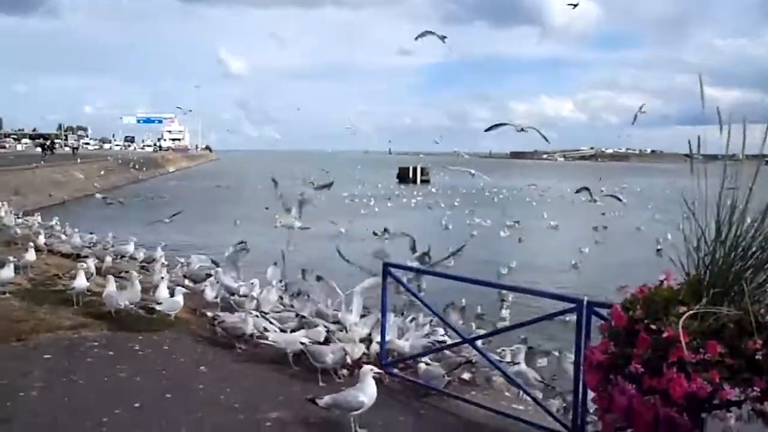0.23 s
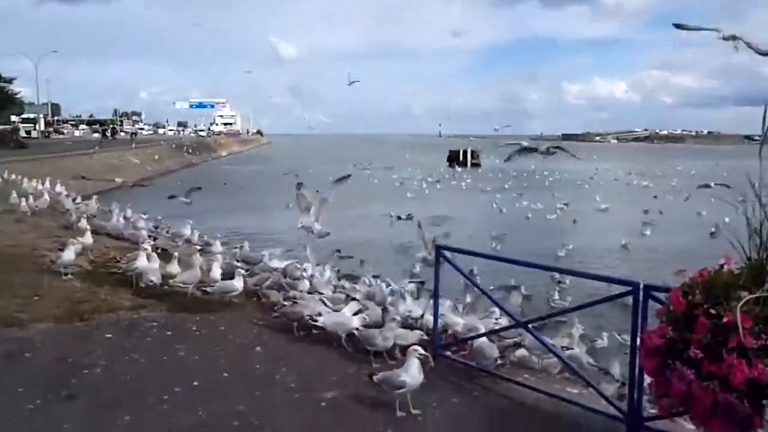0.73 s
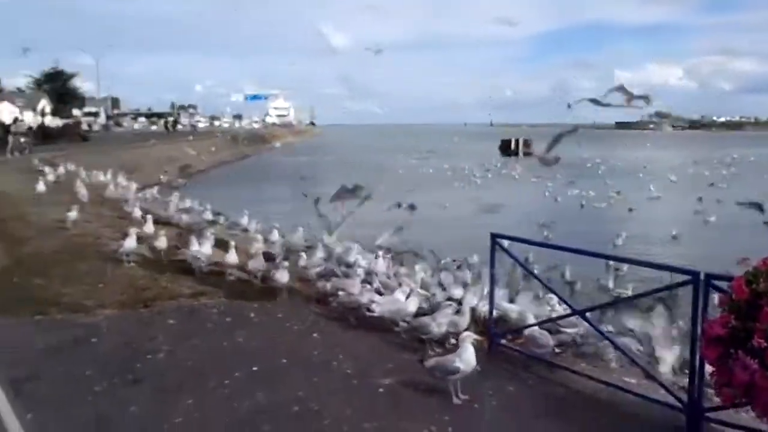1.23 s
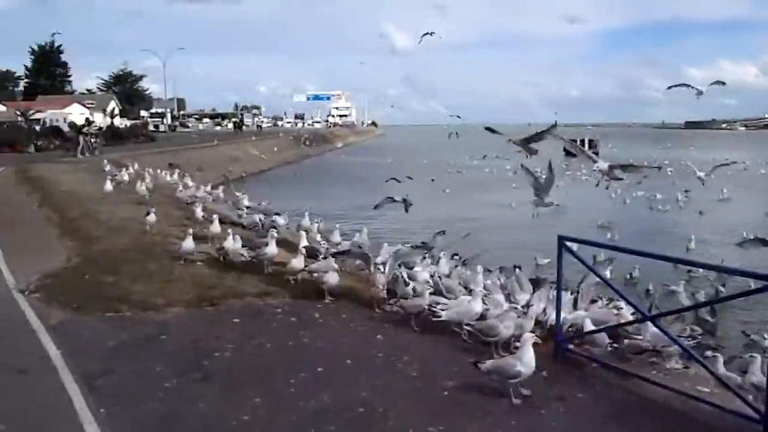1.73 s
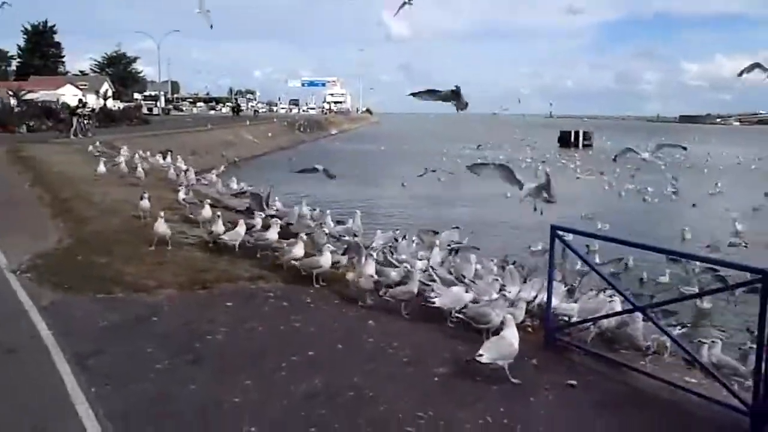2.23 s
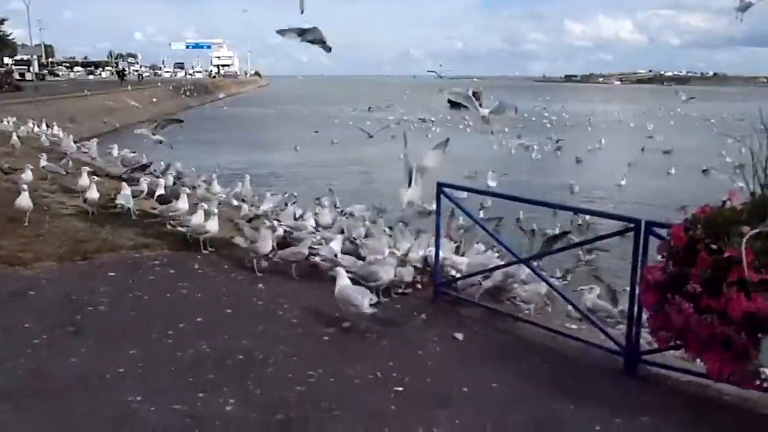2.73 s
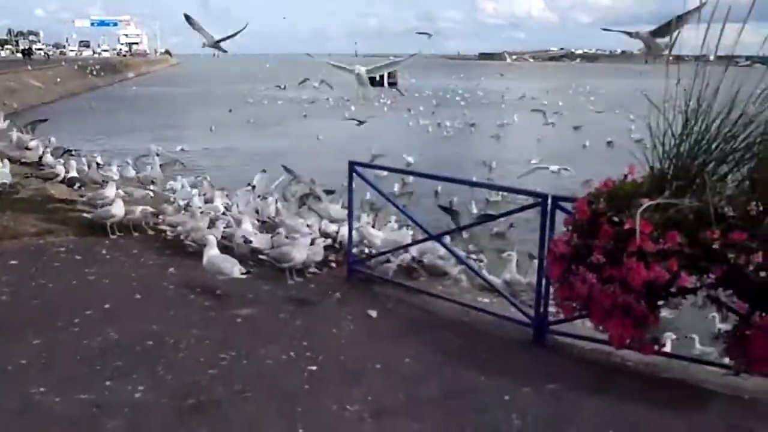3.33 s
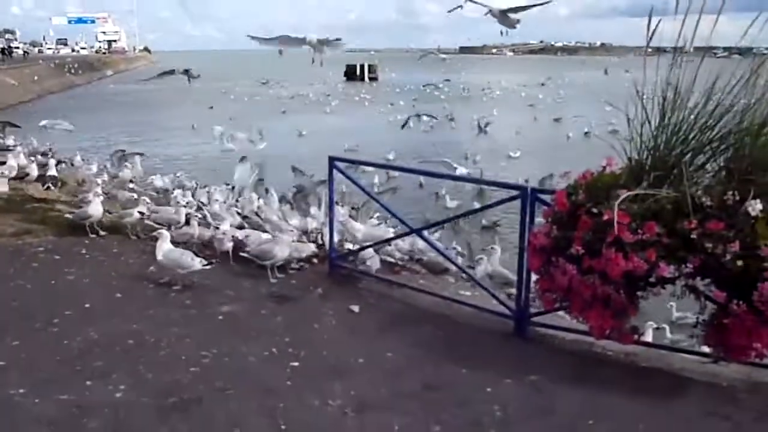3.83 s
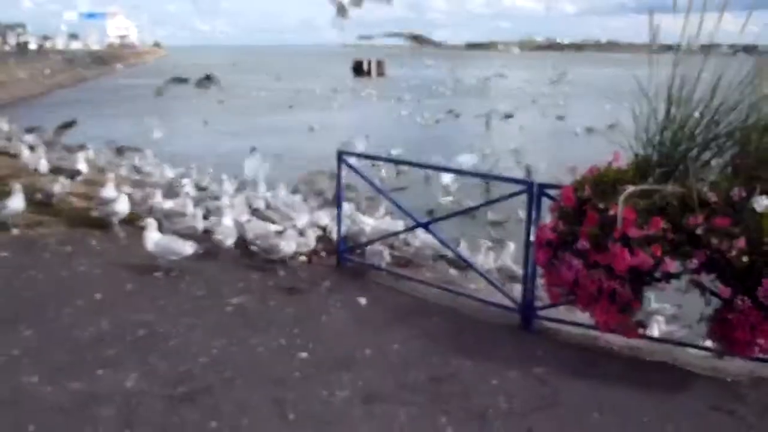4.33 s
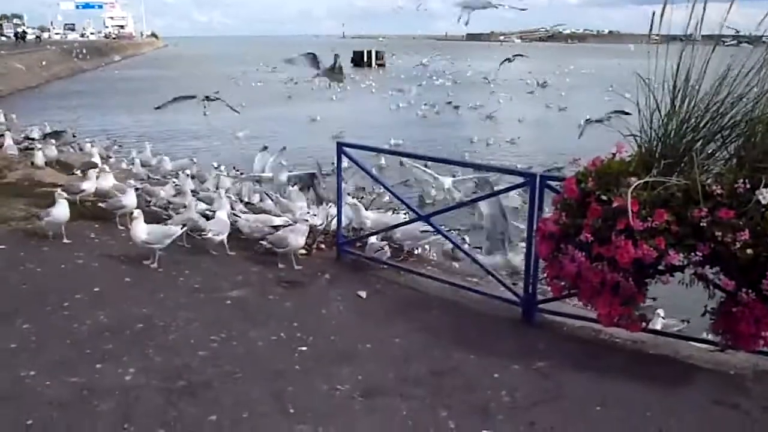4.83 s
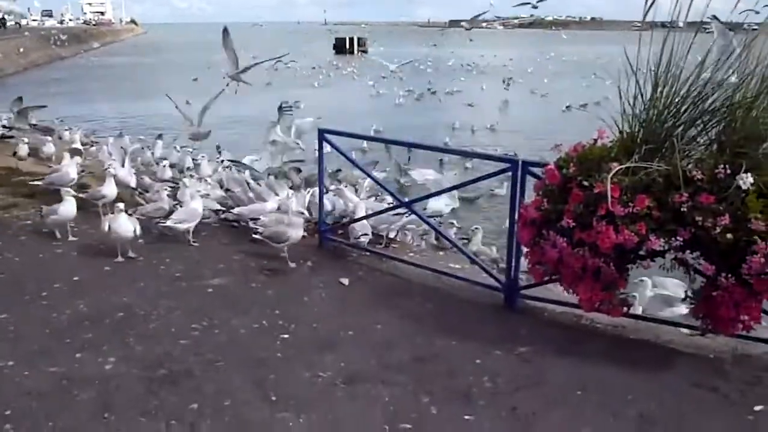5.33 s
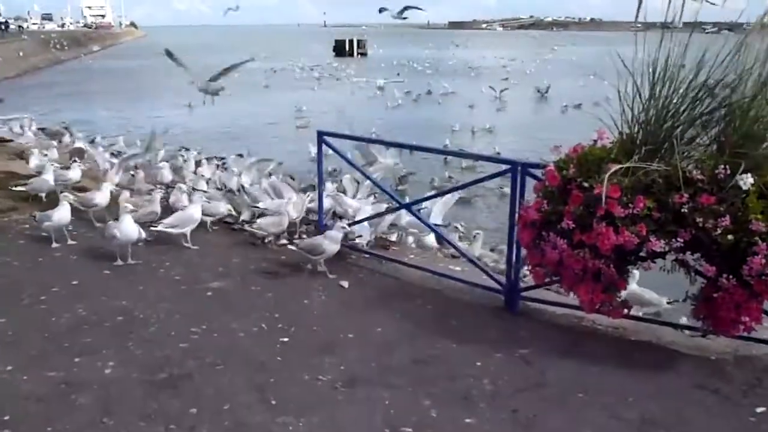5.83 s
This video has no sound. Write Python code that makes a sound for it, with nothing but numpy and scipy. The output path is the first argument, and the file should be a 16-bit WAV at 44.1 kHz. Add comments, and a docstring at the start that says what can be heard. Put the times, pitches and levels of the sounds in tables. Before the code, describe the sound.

A large gull flock feeds at a harbour edge, calling in one dense, continuous chorus. Short yelps, rough squawks, low croaks and clear high whistles of young birds overlap constantly, some a few metres away, the rest blurring into a roar over the water. Faint wind and water wash lie beneath. Open air, almost no echo; a small handheld microphone makes everything bright, thin and piercing.

```python
"""Gulls squabbling on a slipway

Hundreds of gulls squabble over food at a harbour, some only a few metres away.
Adults yelp in stacks of harmonics or rasp in pulsed noise; clear whistled tones are mostly young birds.
Many random calls and a patchy noise roar merge into one chorus, coloured by a microphone peak near 3 kHz.
Behind them: filtered-noise breeze and harbour wash, small dry ticks and the low tone of a far engine."""
import sys
import numpy as np
from scipy import signal
from scipy.fft import rfft, irfft
from scipy.io import wavfile
from scipy.ndimage import uniform_filter1d

SR = 44100
rng = np.random.default_rng(int(sys.argv[2]) if len(sys.argv) > 2 else 0)


def master_out(mix):
    """Clip the mix to full scale and print it as 16-bit PCM to the path in sys.argv[1]."""
    frames = np.transpose(np.atleast_2d(mix))
    ceiling = np.clip(frames, -1, 1)
    pcm = np.round(ceiling * 32767).astype(np.int16)
    wavfile.write(sys.argv[1], SR, pcm)


N = 267951
TIME = np.arange(N) / SR


def gain_of(db):
    """Decibels to a factor."""
    return 10 ** (np.asarray(db) / 20)


def evened(x):
    """Scales to rms 1."""
    return x / np.sqrt(np.mean(x ** 2) + 1e-20)


def add(mix, s, sound):
    """Mixes a sound in at time s, which may lie before the start."""
    at = round(s * SR)
    sound = sound[max(-at, 0):]
    part = mix[max(at, 0):][:len(sound)]
    part += sound[:len(part)]


def coloured(x, points):
    """Filters by a gain curve of (frequency [Hz], level [dB]) points."""
    hz, db = np.transpose(points)
    bins = np.fft.rfftfreq(len(x), 1 / SR)
    gain = gain_of(np.interp(np.log(bins + 1), np.log(hz), db))
    return irfft(rfft(x) * gain, len(x))


def wander(dice, t, per_s):
    """A random curve through normal values of unit spread, a new one per_s times a second."""
    knots = dice.standard_normal(size=1024)
    return np.interp(t * per_s, np.arange(len(knots)), knots)


def own_dice():
    """A separate stream of chance for one bird."""
    return np.random.default_rng(rng.integers(2 ** 31))


def near_birds(cries_db=1, whistles_db=4, rasps_db=2):
    """Single voices out of the chorus: straight cries, whistles and rasps trimmed in dB, bent voices not."""
    # straight adult cries: (time [s], length [s], pitch [Hz], fall [share of pitch, negative rises],
    # level before trim [dB], roughness [0-1], throat resonance [Hz])
    near_cries = [(0.116, 0.1, 1308, .06, -15, 0.1, 3530), (0.488, 0.09, 1229, 0.088, -6.5, 0, 3500),
                  (0.766, 0.1, 1323, .07, -7.5, 0, 3720), (0.945, 0.27, 1071, 0.11, -20, 0.5, 2740),
                  (1.128, 0.015, 1690, .03, -17.5, 0.2, 5460), (1.335, 0.3, 1242, 0.12, -19, 0.9, 3860),
                  (1.996, 0.11, 1338, 0.17, -18.5, 0.4, 1330), (2.074, 0.045, 1540, 0.18, -21.5, 0.3, 6300),
                  (2.53, 0.25, 1311, -0.028, -16.5, 0.2, 2790), (2.691, 0.3, 1620, 0.13, -29, .15, 1940),
                  (2.93, 0.06, 1540, -0.019, -17.5, 0, 1290), (3.248, 0.055, 1430, 0.31, -26, 0.2, 5820),
                  (3.307, .14, 1370, 0.11, -23.5, 0.3, 5800), (3.423, 0.1, 1472, 0.21, -14.5, 0.1, 1950),
                  (3.449, 0.072, 1184, 0.1, -19.5, 0, 3670), (3.663, 0.19, 1406, 0.12, -24.5, 0, 5560),
                  (4.242, 0.14, 1567, 0.08, -15.5, 0.02, 1080), (4.269, 0.36, 1214, .04, -16, 0.3, 1965),
                  (4.584, 0.12, 634.4, .02, -20.5, .25, 3000), (4.54, 0.45, 994, 0.026, -24, 0.1, 1960),
                  (4.594, 0.22, 1210, .07, -18, 0.16, 3420), (4.575, .34, 1292, -0.094, -21, 0.3, 2390),
                  (4.916, 0.043, 1422, 0.11, -14, 0.3, 2355), (4.991, 0.3, 1203, -.025, -19, 0.2, 1560),
                  (5.045, 0.086, 1178, 0.087, -15, 0.13, 3650), (5.134, 0.15, 1346, -0.02, -18, 0.4, 3520),
                  (5.372, 0.096, 1223, 0.085, -15.5, 0.25, 3360),
                  (5.689, 0.2, 1380, 0.055, -18.5, 0.04, 1940), (5.81, 0.066, 1700, 0.19, -17.5, 0, 4840)]
    # voices that bend or warble; the one at 3.05 s a single high whistled tone:
    # (roughness [0-1], throat resonance [Hz], course of (time [s], pitch [Hz], level [dB]))
    bent_voices = [(.08, 4900, [(1.15, 1594, -19.5), (1.16, 1519, -14), (1.18, 1542, -14.5),
                   (1.19, 1585, -25), (1.204, 1505, -15), (1.216, 1543, -13), (1.236, 1540, -17.5),
                   (1.255, 1405, -17.5), (1.275, 1420, -17)]), (0.038, 4900, [(3.05, 4890, -18.5),
                   (3.062, 4910, -8), (3.076, 4970, -8), (3.095, 4870, -12.5), (3.13, 4620, -16.5),
                   (3.155, 4440, -21)]), (0.26, 3900, [(3.63, 762, -26.5), (3.7, 743, -24.5),
                   (3.78, 696, -26.5), (3.87, 662, -19), (3.93, 676, -18), (3.97, 648, -18),
                   (4.0, 633, -25)]), (.08, 4600, [(5.283, 1441, -22.5), (5.32, 1398, -19),
                   (5.375, 1450, -17.5), (5.45, 1370, -25)]), (.04, 4500, [(5.595, 1154, -21),
                   (5.635, 1190, -22), (5.69, 1210, -25)]), (0.0026, 1060, [(5.89, 1330, -17),
                   (5.95, 1247, -16.5), (5.985, 1207, -8.5), (6.1, 1137, -18)])]
    # clear whistled tones, mostly young birds; the last, with its strong octave, perhaps an adult:
    # (time [s], length [s], pitch [Hz], fall [share of pitch, negative rises],
    # level before trim [dB], roughness [0-1], octave level against the tone [dB])
    near_whistles = [(0.761, 0.024, 3290, 0.025, -17.5, 0.3, -15),
                     (0.948, 0.022, 3200, 0.02, -23, 0.2, -20), (1.127, 0.03, 3390, .04, -22, .2, -10),
                     (1.21, 0.11, 3173, -0.0019, -26, 0.3, -17),
                     (1.651, 0.033, 3240, -0.0067, -24.5, 0.2, -12),
                     (1.717, 0.053, 3276, -0.034, -18.5, .15, -11), (1.795, .06, 3270, .02, -23, .1, -14),
                     (1.87, .085, 3225, .015, -22, .12, -14),
                     (2.188, 0.064, 3262, -0.009, -17.5, 0.1, -8.5),
                     (2.253, 0.047, 3264, 0.014, -27, 0.2, -12), (2.3, 0.028, 3200, 0.05, -15, 0.35, -12),
                     (2.349, 0.028, 3214, 0.08, -16, 0.4, -18), (2.9, 0.08, 3327, .02, -21.5, 0.4, -10),
                     (3.575, 0.029, 3024, 0.021, -21, 0.3, -13),
                     (4.014, .078, 3047, -0.035, -18.5, 0.06, -30), (4.097, .025, 3090, 0.041, -18, 0, -16),
                     (4.128, .05, 3075, -0.044, -20, .08, -26), (4.18, 0.035, 3110, .01, -29, .1, -15),
                     (5.598, .025, 3130, .03, -23, .2, -20), (5.77, .022, 3290, .01, -23, .2, -20),
                     (5.901, 0.042, 3153, 0.047, -14.5, .05, -22), (5.943, 0.15, 3283, .006, -30, 0.01, 5)]
    # harsh squawks: (time [s], length [s], level before trim [dB], throat resonance [Hz])
    near_rasps = [(0.451, 0.047, -24, 1790), (0.733, 0.081, -22.5, 1660), (1.485, 0.036, -15.5, 3230),
                  (1.588, 0.027, -19.5, 5960), (1.636, 0.029, -23.5, 2240), (2.318, 0.052, -25, 3750),
                  (2.853, .05, -22, 5120), (3.256, 0.032, -21, 2420), (3.419, 0.026, -22, 1600),
                  (4.233, 0.034, -17.5, 2000), (4.445, 0.027, -21.5, 2200), (4.47, 0.028, -14.5, 2760)]
    out = np.zeros(N)
    for s, length, hz, fall, db, rough, throat_hz in near_cries:
        pitch = contour(length, hz, fall, arch=.05)
        add(out, s, cry(pitch, db + cries_db, rough, throat_hz))
    for rough, throat_hz, course in bent_voices:
        add(out, *bent_voice(rough, throat_hz, course))
    for s, length, hz, fall, db, rough, octave_db in near_whistles:
        add(out, s, whistle(contour(length, hz, fall), db + whistles_db, rough, octave_db))
    for s, length, db, throat_hz in near_rasps:
        add(out, s, rasp(length, 280, db + rasps_db, throat_hz))
    return out


def cry(pitch, db, rough, throat_hz, top_hz=11000):
    """A yelp or cry: a stack of harmonics through the throat, fading above top_hz."""
    low_fade_hz = 980  # a gull's bill radiates little below this
    fade_share = 0.16  # the cry dies away over this last part of its length
    phase, swell = syrinx(pitch, rough)
    swell = swell * np.minimum(np.linspace(1, 0, len(swell)) / fade_share, 1)
    orders = np.arange(1, int(1.3 * top_hz / pitch.mean()) + 1)
    hz = orders * pitch.mean()
    heights = throat(hz, throat_hz) / (1 + (hz / top_hz) ** 6)
    heights = heights / np.sqrt(1 + (low_fade_hz / hz) ** 12)
    stack = np.cos(np.outer(orders.astype(np.float32), phase.astype(np.float32)))
    harmonics = heights.astype(np.float32) @ stack
    return np.sqrt(2) * gain_of(db) * swell * harmonics


def bent_voice(rough, throat_hz, course):
    """A voice that follows its own course of pitch and level; returns its start and its sound."""
    s, hz, db = np.transpose(course)
    t = np.arange(s[0], s[-1], 1 / SR)
    return s[0], cry(np.interp(t, s, hz), np.interp(t, s, db), rough, throat_hz)


def whistle(pitch, db, rough, octave_db, half_db=-26):
    """A clear note, mostly a young bird's begging: a tone, its octave, and a line halfway between."""
    phase, swell = syrinx(pitch, rough)
    octave = gain_of(octave_db) * np.sin(2 * phase)
    halfway = gain_of(half_db) * np.sin(1.5 * phase)
    return np.sqrt(2) * gain_of(db) * swell * (np.sin(phase) + octave + halfway)


def rasp(length, per_s, db, throat_hz, open_share=0.32):
    """A harsh squawk: the syrinx slaps slowly and unevenly, each slap a puff through the throat."""
    dice = own_dice()
    t = np.arange(int(max(length, .01) * SR)) / SR
    turns = np.cumsum(per_s * (1 + .12 * wander(dice, t, 200))) / SR
    # each puff of noise decays over open_share of the slap period
    puffs = np.exp(-(turns % 1) / open_share) * dice.standard_normal(len(t))
    bins = np.fft.rfftfreq(len(t), 1 / SR) + 1
    mouth_gain = throat(bins, throat_hz) / (1 + (bins / 9000) ** 4)
    voiced = irfft(rfft(puffs) * mouth_gain, len(t))
    return gain_of(db) * evened(voiced) * signal.windows.tukey(len(t), .5)


def syrinx(pitch, rough):
    """Phase and loudness of one call along a pitch curve, shaken more the rougher the voice is."""
    dice = own_dice()
    t = np.arange(len(pitch)) / SR
    quaver = (.002 + .02 * rough) * wander(dice, t, 110)
    jitter = .05 * rough * wander(dice, t, 900)
    # loudness trembles too, quickly and slowly
    tremble = .9 * wander(dice, t, 520) + wander(dice, t, 45)
    flutter = np.exp(min(rough + .08, .7) * tremble)
    # 5 ms rise, 11 ms release
    swell = np.minimum(t / .005, 1) * np.minimum((t[-1] - t) / .011, 1)
    phase = 2 * np.pi * np.cumsum(pitch * (1 + quaver + jitter)) / SR
    return phase, swell * evened(flutter)


def throat(hz, centre_hz, depth_db=12, octaves=0.63):
    """One broad resonance of throat and open bill: -6 dB at its top, -18 dB far from it."""
    bump = np.exp(-(np.log2(hz / centre_hz) / octaves) ** 2)
    return gain_of(depth_db * (bump - 1.5))


def contour(length, hz, fall, arch=0):
    """Pitch curve of a near call: a glide, arched if short, while calls well over 0.16 s go straight."""
    ends = 1 - arch / (1 + (length / .16) ** 6)
    return glide(length, hz * (ends + fall / 2), hz, hz * (ends - fall / 2))


def glide(length, *pitches):
    """Pitch curve of one call, an arc through its start, middle and end."""
    arc = np.polyfit([0, .5, 1], pitches, 2)
    return np.polyval(arc, np.linspace(0, 1, int(max(length, .01) * SR)))


def warbled(pitch):
    """Lets a crowd voice waver in pitch by a 1.5 % spread, 60 random turns a second."""
    t = np.arange(len(pitch)) / SR
    return pitch * (1 + .015 * wander(own_dice(), t, 60))


def crowd(yelps_db=10, croaks_db=6, rasps_db=5, far_db=8.0, young_db=1, screech_db=-3.5):
    """Adult and young choruses, each swelling and sinking with its birds' excitement."""
    # slow course of the adult chorus: (time [s], relative level [dB])
    adult_course = [(0, -32), (0.28, -36.5), (0.7, -29), (0.88, -34), (1.07, -32.5), (1.3, -36),
                    (1.45, -33.5), (1.7, -30.5), (1.95, -37.5), (2.16, -30.5), (2.32, -34.5), (2.96, -32.5),
                    (3.12, -36.5), (3.45, -32.5), (3.93, -32.5), (4.12, -34.5), (4.46, -33.5),
                    (4.62, -38.5), (5.2, -31.5), (5.9, -31.5)]
    # slow course of the young chorus: (time [s], relative level [dB])
    young_course = [(0, -21.5), (0.48, -26.5), (0.72, -24), (1.05, -29.5), (1.3, -22.5), (1.6, -26.5),
                    (1.88, -21.5), (2.07, -24.5), (2.2, -21), (2.7, -23.5), (2.95, -21.5), (3.35, -26.5),
                    (3.7, -22), (4.1, -33.5), (4.47, -25), (4.58, -24), (4.95, -24), (5.35, -30)]
    yelps = crowd_cries(count=280, pitch_hz=1380, spread=.13, distance_db=1.84, throat_hz=2730,
                        throat_spread=0.2, roughness=.36, length_s=.1)
    croaks = crowd_cries(count=80, pitch_hz=580.4, spread=.18, distance_db=2, throat_hz=2410,
                         throat_spread=0.21, roughness=.33, length_s=.1)
    screeches = crowd_cries(count=170, pitch_hz=1567, spread=0.11, distance_db=2, throat_hz=5100,
                            throat_spread=0.14, roughness=.55, length_s=.06)
    adults = gain_of(yelps_db) * yelps + gain_of(croaks_db) * croaks
    adults = adults + gain_of(rasps_db) * crowd_rasps() + gain_of(far_db) * far_flock()
    # the screeches rise and fall with the young birds
    young = gain_of(young_db) * crowd_young() + gain_of(screech_db) * screeches
    return adults * chorus_level(adult_course) + young * chorus_level(young_course)


def chorus_level(curve):
    """Gain of one chorus: its slow course with random surges on top."""
    surge_db, surges_per_s = -1, 20
    course_db = np.interp(TIME, *np.transpose(curve))
    return gain_of(course_db + surge_db * wander(rng, TIME, surges_per_s))


def random_birds(count, uniforms, normals, limit=2):
    """Numbers the calls of a crowd and draws each one's even (0-1) and bell-shaped chances."""
    even = rng.random((count, uniforms))
    bell = rng.standard_normal((count, normals)).clip(-limit, limit)
    return zip(range(count), even, bell)


def crowd_cries(count, pitch_hz, spread, distance_db, throat_hz, throat_spread, roughness, length_s):
    """Many birds at many distances, short wavering cries that rise or sag a little."""
    out = np.zeros(N)
    for k, even, bell in random_birds(count, 5, 3, limit=1.7):
        when, long, rise, sag, harsh = even
        size, near, mouth = bell
        hz = pitch_hz * np.exp(spread * size)
        length = length_s * (.5 + long)
        pitch = glide(length, hz * (.96 + .08 * rise), hz, hz * (1.01 - .12 * sag))
        rough = roughness * (0.31 + harsh)
        mouth_hz = throat_hz * np.exp(throat_spread * mouth)
        call = cry(warbled(pitch), distance_db * near, rough, mouth_hz, top_hz=6800)
        add(out, (k + when) / count * (TIME[-1] + .2) - .2, call)
    return evened(out)


def crowd_young(count=250, pitch_hz=3190, spread=.038, distance_db=1.0, roughness=0.24):
    """Many young birds, all whistling near the same pitch."""
    out = np.zeros(N)
    for k, even, bell in random_birds(count, 3, 4):
        when, long, harsh = even
        size, near, first, last = bell
        hz = pitch_hz * np.exp(spread * size)
        pitch = glide(0.03 + 0.08 * long, hz * (1 + 0.033 * first), hz, hz * (.98 + 0.032 * last))
        rough = 0.08 + roughness * harsh
        call = whistle(warbled(pitch), distance_db * near, rough, octave_db=-25.5, half_db=-21)
        add(out, (k + when) / count * (TIME[-1] + .1) - .1, call)
    return evened(out)


def crowd_rasps(count=130, distance_db=2, throat_hz=2500):
    """Short quarrelling squawks all through the flock."""
    out = np.zeros(N)
    for k, even, bell in random_birds(count, 3, 2):
        when, long, fast = even
        near, mouth = bell
        mouth_hz = throat_hz * np.exp(0.2 * mouth)
        call = rasp(0.03 + 0.12 * long, 160 + 220 * fast, distance_db * near, mouth_hz)
        add(out, (k + when) / count * TIME[-1], call)
    return evened(out)


def far_flock(patchy_db=5.0):
    """Out on the water the cries blur into a roar: noise with drifting patches of pitch."""
    # spectrum of the roar: (frequency [Hz], relative density [dB per Hz])
    roar_colour = [(700, -19.5), (1100, 7.5), (1500, 1.5), (2500, 5), (4000, -11), (7000, 1.5),
                   (10000, -0.5)]
    roar = coloured(rng.standard_normal(N), roar_colour)
    _, _, z = signal.stft(roar, SR, nperseg=512, noverlap=384)
    # random gains smoothed over neighbouring frequencies, then over time
    patches = uniform_filter1d(rng.standard_normal(z.shape), size=2, axis=0)
    patches = evened(uniform_filter1d(patches, size=16, axis=1))
    _, patchy = signal.istft(z * gain_of(patchy_db * patches), SR, nperseg=512, noverlap=384)
    return evened(patchy[:N])


def quay(x, wet_db=-15, t60=0.034):
    """Weak scattered echoes from paving, sea wall and water, dying by 60 dB in t60 seconds."""
    t = np.arange(SR // 2) / SR
    struck = rng.random(len(t)) < 2000 / SR  # about 2000 echoes a second
    taps = rng.standard_normal(len(t)) * struck * (t > .006) * gain_of(-60 * t / t60)
    echoes = signal.fftconvolve(x, taps / np.linalg.norm(taps))[:N]
    return x + gain_of(wet_db) * echoes


def ticks(level_db=3, decay=0.00015):
    """Tiny dry ticks above the chorus: noise bursts that decay in a fraction of a millisecond."""
    # faint ticks: (time [s], peak before level_db [dB])
    tick_peaks = [(0.1411, -33), (0.212, -38), (0.7903, -34), (1.627, -30), (2.3246, -27), (2.3695, -40),
                  (3.0787, -31), (3.241, -40), (4.1708, -33), (4.263, -38), (5.18, -30.5)]
    out = np.zeros(N)
    t = np.arange(SR // 200) / SR
    for s, db in tick_peaks:
        tick = rng.standard_normal(len(t)) * np.exp(-t / decay)
        add(out, s, gain_of(db + level_db) * tick / abs(tick).max())
    return out


def background():
    """Gusts on the microphone, the uneven wash of the harbour and a distant engine."""
    return gusts() + harbour_wash() + engine_hum()


def gusts():
    """Wind brushing the microphone: low-heavy noise that follows the strength of the breeze."""
    # wind spectrum: (frequency [Hz], relative density [dB per Hz])
    wind_colour = [(15, -9), (40, -2), (90, -5), (160, -5.5), (230, -14), (400, -14.5), (900, -21),
                   (3000, -67.5)]
    return evened(coloured(rng.standard_normal(N), wind_colour)) * breeze()


def breeze(buffet_db=1.5, buffets_per_s=20):
    """Strength of the wind: each gust rises, holds and drops back to the lull, buffeting as it goes."""
    # gusts: (time [s], length [s], level before buffeting [dB])
    gust_course = [(-0.04, 0.17, -47), (0.43, 0.58, -46), (0.962, 0.3, -46.5), (1.325, 0.48, -50.5),
                   (2.006, 0.25, -39.5), (2.69, 0.14, -48.5), (2.832, 0.2, -51.5), (3.273, 0.27, -50.5),
                   (3.72, 0.48, -53), (4.198, 1, -57), (5.18, 0.36, -46.5), (5.668, 0.18, -44.5)]
    rise_s, fall_s, lull_db = 0.03, 0.091, -56.5
    strength = gain_of(lull_db) * np.ones(N)
    for s, length, db in gust_course:
        shape = np.minimum((TIME - s) / rise_s, (s + length - TIME) / fall_s).clip(0, 1)
        strength = np.hypot(strength, gain_of(db) * shape)  # powers add
    return strength * gain_of(buffet_db * wander(rng, TIME, buffets_per_s))


def harbour_wash(harbour_db=-49.5, lapping_db=-2.0):
    """Steadily coloured noise whose level laps up and down at random."""
    # harbour spectrum: (frequency [Hz], relative density [dB per Hz])
    wash_colour = [(20, -24.5), (100, -17.5), (300, 4), (450, -4.5), (620, 3.5), (850, -8.5), (2000, 3),
                   (8000, -28.5), (10500, -24), (14000, -30)]
    level = gain_of(harbour_db + lapping_db * wander(rng, TIME, 36))
    return level * evened(coloured(rng.standard_normal(N), wash_colour))


def engine_hum(hum_db=-74.0, hum_hz=53.8, rise_db_per_s=3.5):
    """A far engine: one low sine with a drifting phase, growing slowly louder from hum_db."""
    tone = np.sin(2 * np.pi * hum_hz * TIME + .5 * wander(rng, TIME, 4.3))
    return gain_of(hum_db + rise_db_per_s * TIME) * evened(tone)


def scene():
    """The gulls, coloured by the microphone's resonances, over the quiet harbour."""
    # microphone response: (frequency [Hz], gain [dB])
    mic_response = [(500, -49), (800, -15.5), (1200, -15.5), (1900, -7.5), (2600, -5.5), (2900, -2),
                    (3200, -0.5), (3600, -6), (3900, -13), (4250, -25), (4850, -11.5), (5600, -23),
                    (7200, -32.5), (8400, -43), (10800, -42), (14000, -49)]
    gulls = coloured(quay(crowd() + near_birds()), mic_response)
    return (gulls + background() + ticks())[None]


def record(dry):
    """Gentle gain control holds the chorus level; then the recorder's band limit."""
    limit_db, ratio, recover_db_per_s, edge_hz = -20.5, 1.41, 37.5, 14400
    power_db = 10 * np.log10(abs(uniform_filter1d(dry[0] ** 2, size=900)) + 1e-12)
    # the sensed level follows peaks at once and sinks at the recovery rate
    recovery = TIME * recover_db_per_s
    sensed_db = np.maximum.accumulate(power_db + recovery) - recovery
    over_db = np.maximum(sensed_db - limit_db, 0)
    held = dry * gain_of(-uniform_filter1d(over_db, size=400) * (1 - 1 / ratio))
    lowpass = signal.firwin(511, edge_hz, window=("kaiser", 9), fs=SR)
    return signal.oaconvolve(held, lowpass[None], "same")


dry = scene()
out = record(dry)
master_out(out)
```